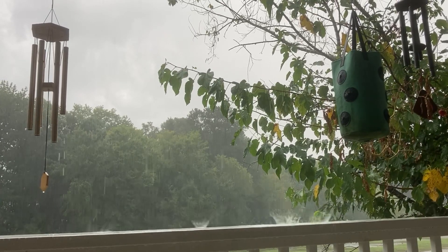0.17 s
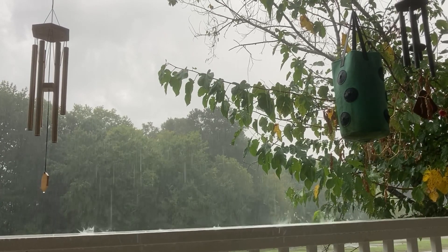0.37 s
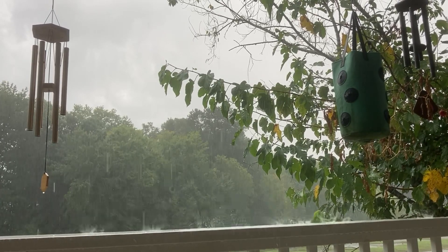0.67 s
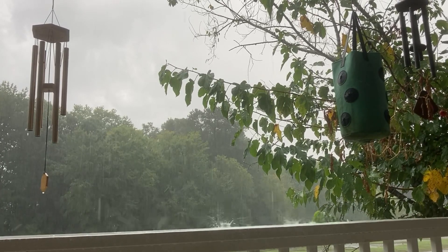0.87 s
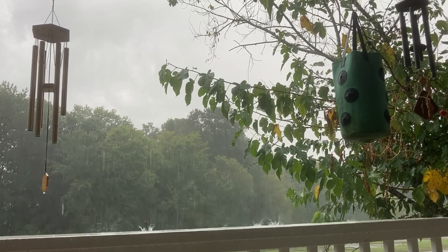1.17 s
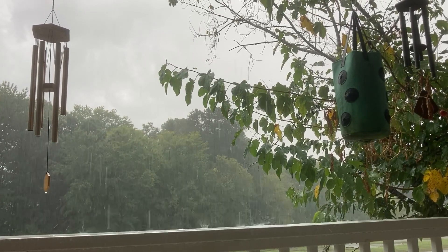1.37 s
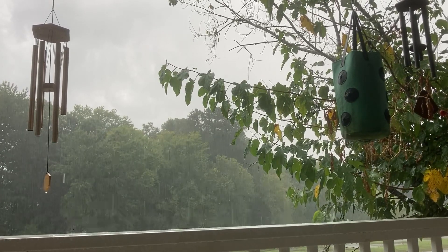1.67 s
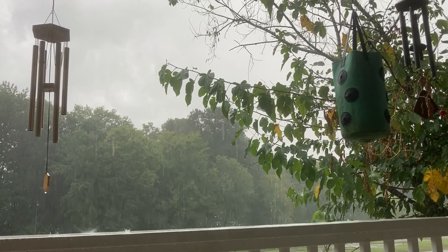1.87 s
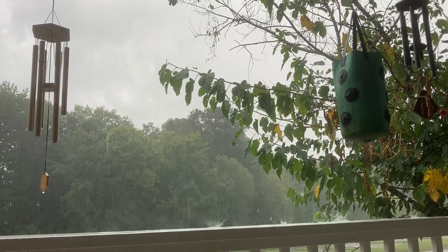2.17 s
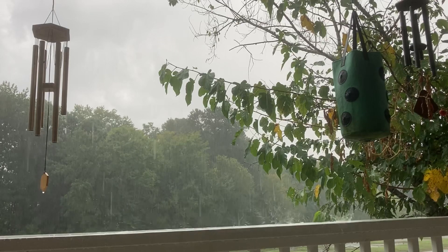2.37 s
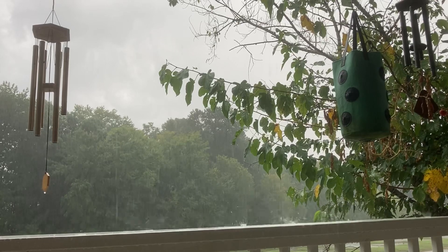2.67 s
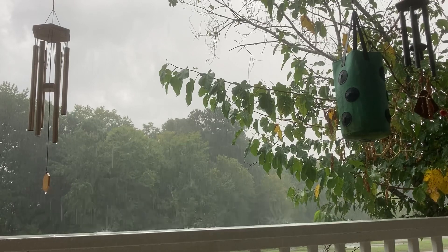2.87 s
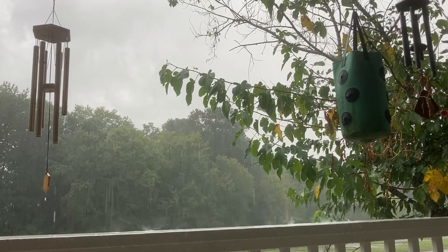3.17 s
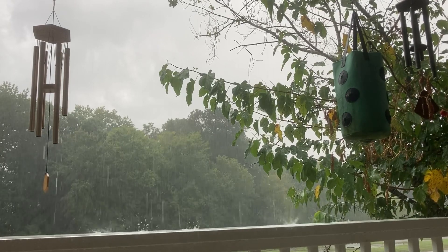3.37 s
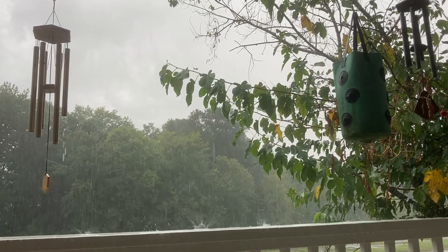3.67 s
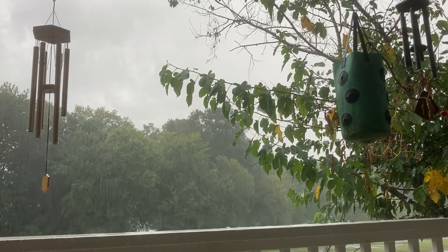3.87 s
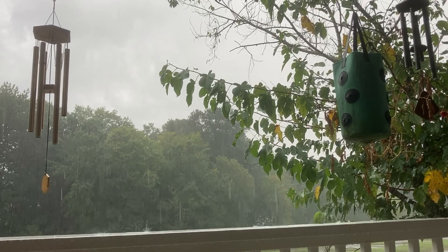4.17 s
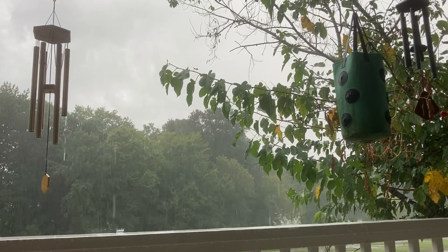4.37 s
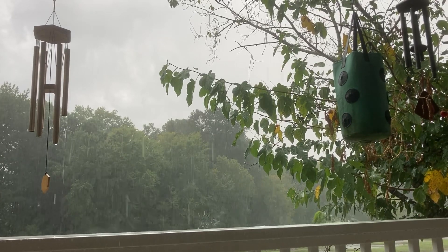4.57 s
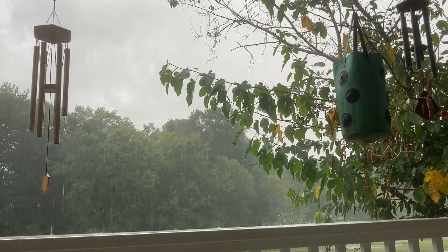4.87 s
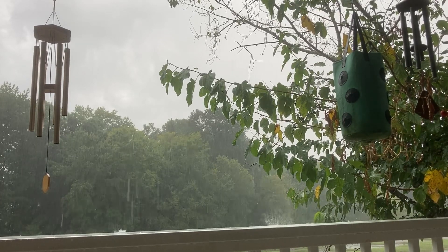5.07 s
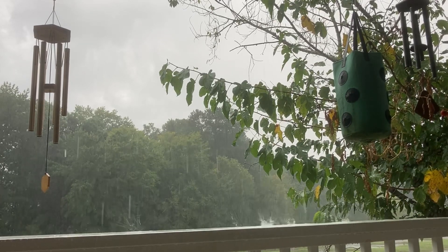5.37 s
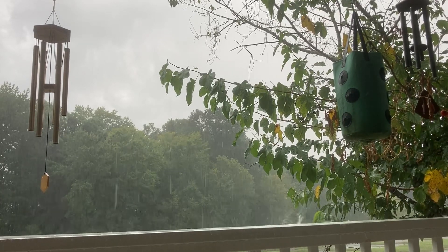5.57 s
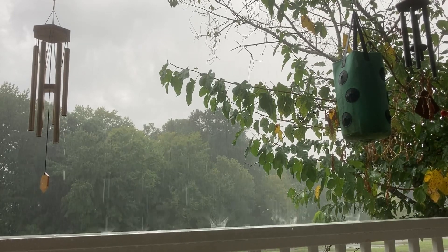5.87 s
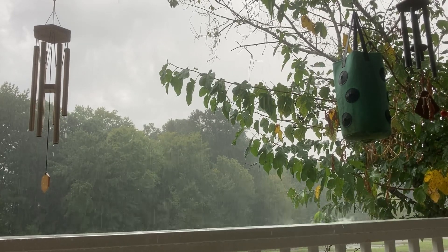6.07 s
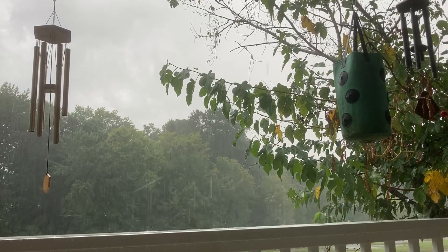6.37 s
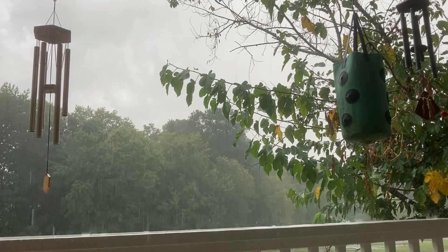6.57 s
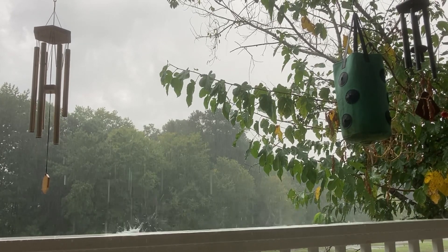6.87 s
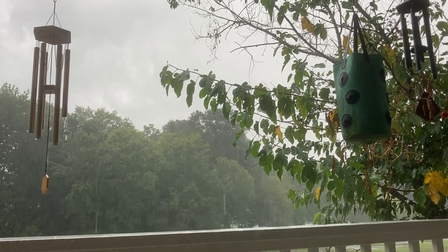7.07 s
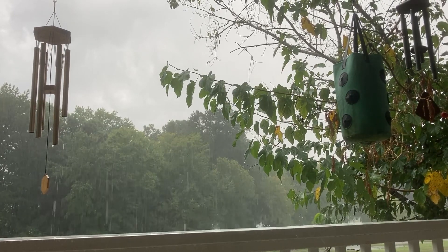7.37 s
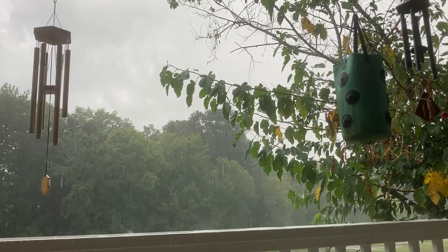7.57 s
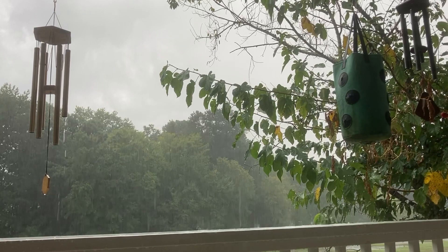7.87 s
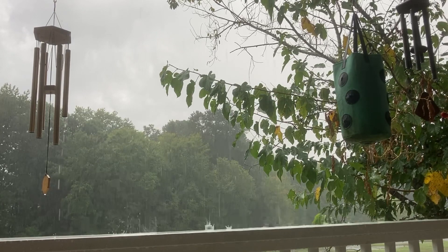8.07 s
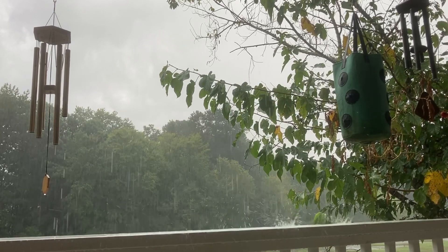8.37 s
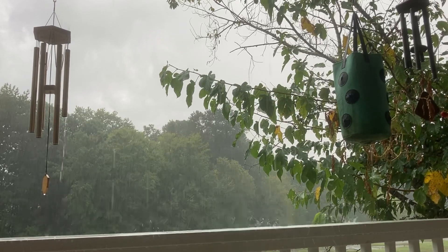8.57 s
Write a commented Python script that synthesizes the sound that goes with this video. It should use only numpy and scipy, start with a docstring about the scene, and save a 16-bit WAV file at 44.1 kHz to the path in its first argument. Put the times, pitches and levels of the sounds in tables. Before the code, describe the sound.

Low far-off thunder booms and dies away behind a steady downpour, with leaf patter, tiny plinks and sharp close drops smacking a wet porch rail.

```python
"""Far thunder is rolling as we begin: three swells, then a fade, behind heavy rain on trees and a lawn.
Heard from a porch: filtered noise makes the boom and the wash, small drops patter on leaves, bubbles plink.
Fat drops from the eaves smack the wet railing close by: short pushes into resonances, with porch echo and spray.
A thin whine runs throughout and a faint moan joins near the end. Two closely spaced ports pick up the rain."""
import sys
import numpy as np
from scipy import signal
from scipy.fft import rfft, irfft
from scipy.io import wavfile
from scipy.ndimage import uniform_filter1d

SR = 44100
rng = np.random.default_rng(int(sys.argv[2]) if len(sys.argv) > 2 else 0)


def output_pcm(signal):
    """Save a mono or channel-first signal as 16-bit PCM at the path in sys.argv[1].

    Samples are clipped to [-1, 1] before scaling.
    """
    pcm = np.clip(np.atleast_2d(signal).T, -1, 1) * 32767
    wavfile.write(sys.argv[1], SR, np.round(pcm).astype(np.int16))


N = 384993

# centre pitches of the thunder's boom, growl and rattle: [f/Hz]
REGISTER_CENTRES = [65, 122, 180]


def amp(db):
    """Decibels to a linear gain."""
    return 10 ** (np.asarray(db) / 20)


def evened(x):
    """Scales x to an rms of one."""
    return x / np.sqrt(np.mean(x ** 2) + 1e-20)


def unit_energy(x):
    """Scales each channel to an energy of one."""
    return x / np.linalg.norm(x, axis=-1, keepdims=True)


def read(points, hz):
    """A table's value at each frequency, on a log axis."""
    f, value = np.transpose(points)
    return np.interp(np.log(hz + 1), np.log(f + 1), value)


def bins(size):
    """The frequencies, in Hz, of a spectrum of this many samples."""
    return np.fft.rfftfreq(size, 1 / SR)


def colour(x, db):
    """Filters x by a gain in dB for each of its frequency bins."""
    return irfft(rfft(x) * amp(db), x.shape[-1])


def ring(x, hz, q):
    """A single resonance; the higher q, the narrower."""
    return signal.lfilter(*signal.iirpeak(min(hz, SR / 3), max(q, 1), fs=SR), x)


def add(mix, s, sound):
    """Lays a sound into the mix at s seconds, cut at the end."""
    part = mix[:, max(round(s * SR), 0):][:, :sound.shape[1]]
    part += sound[:, :part.shape[1]]


def drifting(shape, frames):
    """Noise smoothed over this many frames, at an rms of one."""
    return evened(uniform_filter1d(rng.standard_normal(shape), size=frames, axis=0))


def swell(t, full_s, hold_s, fade_db_per_s, rise_s=0.58):
    """The gain of one roll: it swells, holds, then dies away among the hills."""
    rise = np.clip(1 + (t - full_s) / rise_s, 0, 1)
    return rise * amp(-fade_db_per_s * np.maximum(t - full_s - hold_s, 0))


def surges(t, centre_hz, thump_s=0.028, thump_octaves=0.46, lull_s=0.044):
    """The gain by which thumps lift one register of the thunder, most near their pitch, and lulls sink the boom."""
    # single surges that stand out of a roll: [t/s, lift at its own pitch/dB, f/Hz]
    thumps = [(0.29, 5, 65), (0.65, 7, 65), (0.80, -1, 65), (1.04, 0, 65), (1.62, 5, 65), (1.88, 4.5, 75),
              (1.97, 8, 65), (2.10, 5.5, 65), (2.27, 5, 120), (2.43, 9, 65), (2.55, 2.5, 160),
              (2.73, 2.5, 125), (2.85, 2, 65), (3.01, 4, 65), (3.16, 6, 150), (3.31, 2, 175),
              (3.411, 1.5, 64), (3.63, 10, 88), (3.94, 8, 65), (4.31, 11.5, 122), (4.47, 20, 94),
              (4.57, 1, 122), (4.67, 2.5, 175), (4.85, 5, 120), (4.93, 9.5, 65), (5.07, 6.5, 175),
              (5.219, 7, 65), (5.37, 9, 65), (5.64, 4.5, 65), (6.06, 7.5, 65)]
    # lulls of the boom between surges: [t/s, change/dB]
    lulls = [(0.15, -3), (0.46, -7), (1.15, -7), (1.44, -4.5), (2.33, -3), (2.64, -2.5), (3.33, -8),
             (4.25, -7), (5.89, -6)]
    gain_db = 0
    for s, db, hz in thumps:
        octaves_off = np.log2(hz / centre_hz)
        gain_db = gain_db + db * np.exp(-((t - s) / thump_s) ** 2 - (octaves_off / thump_octaves) ** 2)
    if centre_hz == REGISTER_CENTRES[0]:
        for s, db in lulls:
            gain_db = gain_db + db * np.exp(-((t - s) / lull_s) ** 2)
    return amp(gain_db)


def thunder(growl_hz=98, rattle_hz=153, apart=0.14, low_cut_hz=39.7, steady_s=0.17):
    """Arrivals from all along a far lightning channel merge into a boom; nearer stretches growl and rattle higher."""
    # thunder dulled by distance, coloured by ground and walls: [f/Hz, relative level per Hz/dB]
    boom_colour = [(24, -13), (38, -8.5), (52, -11), (62, -0.5), (76, -5.5), (98, -16), (114, -3.5),
                   (134, -7), (156, -15), (173, -9), (188, -19), (202, -12), (235, -23.5), (290, -26.5),
                   (460, -64)]
    # the thunder lies to the right: [f/Hz, left minus right/dB]
    lean = [(70, -0.8), (120, -6), (250, -2)]
    # rolls: [full strength t/s, hold/s, boom level/dB, growl level/dB, rattle level/dB]
    rolls = [(0.15, 0.68, -34, -44.5, -47), (1.9, 0.74, -33, -39, -45), (4.35, 0.5, -35.5, -41.5, -44.5)]
    # boom, growl and rattle of every roll: [lag/s, extra hold/s, fade/dB per s, lingering rumble level/dB]
    registers = [(0.019, 0.15, 5.5, -49.5), (0.02, 0.01, 6.5, -54), (0.22, 0.55, 10.5, -54.5)]

    t, hz = np.arange(N) / SR, bins(N)
    mid, side = colour(rng.standard_normal((2, N)), read(boom_colour, hz))
    ports = np.array([mid + apart * side, mid - apart * side])
    ports = colour(ports, read(lean, hz) * np.array([[.5], [-.5]]))
    # steep splits into the three registers
    boom = colour(ports, -20 * np.log10(1 + (hz / growl_hz) ** 20))
    below_rattle = colour(ports, -20 * np.log10(1 + (hz / rattle_hz) ** 20))
    bands = [boom, below_rattle - boom, ports - below_rattle]

    window = max(round(steady_s * SR), 1)  # flutter quicker than this is left to chance
    out = np.zeros((2, N))
    for k, band in enumerate(bands):
        lag_s, longer_s, fade, linger_db = registers[k]
        wanted = amp(linger_db) ** 2
        for s, hold_s, *dbs in rolls:
            wanted = wanted + (amp(dbs[k]) * swell(t - lag_s, s, hold_s + longer_s, fade)) ** 2
        power = uniform_filter1d(uniform_filter1d(band.mean(0) ** 2, size=window), size=3000)
        out += band * surges(t, REGISTER_CENTRES[k]) * np.sqrt(wanted / (power + 1e-20))
    # the microphone rolls off the lowest octave
    return colour(out, -10 * np.log10(1 + (low_cut_hz / (hz + 1)) ** 8))


def wash(level_db=-38.2, patchy_db=2.0, swell_db=-0.26, flicker_db=1.5):
    """Countless far drops merge into a hiss in drifting patches; its treble flickers as clusters of drops land."""
    # far rain: [f/Hz, relative level per Hz/dB]
    rain_colour = [(40, -8), (130, 1), (210, 6), (290, 7.4), (400, 4.2), (600, .6), (1000, 1.2),
                   (1500, -.1), (2300, 1.6), (3000, -.3), (4400, -.9), (5500, -3.9), (7000, -5.5),
                   (8400, -5), (10000, -4.2), (12500, -7.3), (14500, -10.6), (16000, -12.5)]
    frames, hz = N // 256 + 6, bins(1024)
    shape = (2, frames, len(hz))
    z = rng.standard_normal(shape) + 1j * rng.standard_normal(shape)
    # patches spread over neighbouring frames and neighbouring pitches
    patches = uniform_filter1d(rng.standard_normal(shape[1:]), size=11, axis=0)
    patches = evened(uniform_filter1d(patches, size=3, axis=1))
    slow = drifting((frames, 1), 60)
    flicker = drifting((frames, 1), 6) * np.minimum(hz / 9000, 1)
    z = z * amp(patchy_db * patches + swell_db * slow + flicker_db * flicker)
    hiss = signal.istft(z.transpose(0, 2, 1), nperseg=1024, noverlap=768)[1][:, :N]
    return amp(level_db) * evened(colour(hiss, read(rain_colour, bins(N))))


def whine(level_db=-62, hz=7250, width_hz=70):
    """A thin steady whine under the rain, perhaps an insect in the trees: noise through a narrow resonance."""
    return amp(level_db) * evened(ring(rng.standard_normal((2, N)), hz, hz / width_hz))


def smack(hz, echo_db, push_s, q, below=0.7, echo_t60=0.16, gap_s=0.0035):
    """One drop: a very short push into a resonance, then scattered reflections from the porch."""
    t = np.arange(SR // 6) / SR
    push, taps = rng.standard_normal((2, 2, len(t)))
    push = push * np.exp(-t / push_s)
    sparse = rng.random(taps.shape) < .2
    taps = taps * sparse * amp(-60 * t / echo_t60) * np.clip(t / gap_s - .5, 0, 1)
    # so small a source radiates little below its pitch
    highpass = signal.butter(6, min(below * hz, SR / 3), "high", fs=SR, output="sos")
    paths = signal.sosfilt(highpass, [push, taps])
    direct, echo = unit_energy(ring(ring(paths, hz, q), hz, q))
    # the direct energy counts as if spread over about a millisecond and a half
    return (direct + amp(echo_db) * echo) * np.sqrt(SR * 0.0014)


def leaves(level_db=-49, drops_per_s=260, spread_db=2.5, low_hz=1800, high_hz=12000,
           echo_db=-2, push_s=0.0011, q=1.84, count=24):
    """Small drops patter on the leaves; each set of leaves has its own pitch and channel balance."""
    out = np.zeros((2, N))
    for hz in np.geomspace(low_hz, high_hz, count):
        size = amp(spread_db * np.minimum(rng.exponential(1, N), 3.5))
        hits = size * (rng.random(N) < drops_per_s / count / SR)
        balance = amp(rng.uniform(-0.24, 6.2) * np.array([[1], [-1]]))
        out += signal.oaconvolve(hits[None], balance * smack(hz, echo_db, push_s, q), axes=1)[:, :N]
    return amp(level_db) * evened(out)


def puddles(level_db=-48.5, drips_per_s=330, spread_db=1.0, low_hz=1100, high_hz=5000,
            cycles=18, rise=0.0372, count=48):
    """Drips trap bubbles that ring for some cycles and rise slightly in pitch."""
    out, t = np.zeros((2, N)), np.arange(SR // 12) / SR
    for hz in np.geomspace(low_hz, high_hz, count):
        age = hz * t / cycles
        plink = np.sin(2 * np.pi * hz * t * (1 + rise * age / 2)) * np.exp(-age)
        size = amp(spread_db * np.minimum(rng.exponential(1, (2, N)), 3)) * np.sqrt(hz)
        # each channel takes half of the drips
        hits = size * (rng.random((2, N)) < drips_per_s / count / SR / 2)
        out += signal.oaconvolve(hits, plink[None], axes=1)[:, :N]
    return amp(level_db) * evened(out)


def railing_echo(echo_db, level_db, near_db=-19.5, wetter=0.38):
    """Faint drops land further along the railing: more echo, in dB, for each dB below a drop by the microphone."""
    return echo_db + wetter * (near_db - level_db)


def spray(fall_s=0.2, rise_s=0.0014, droplets_per_s=3500, low_hz=7000):
    """The burst drop comes down again as a fading shower of tiny droplets."""
    t = np.arange(SR // 3) / SR
    droplets = rng.standard_normal((2, len(t))) * (rng.random(len(t)) < droplets_per_s / SR)
    fizz = signal.lfilter(*signal.butter(2, min(low_hz, SR / 3), "high", fs=SR), droplets)
    return evened(fizz) * np.exp(-t / fall_s) * (1 - np.exp(-t / rise_s))


def splashes(spray_db=1, echo_db=-3.5, push_s=0.0011, q=1.4):
    """Drops burst the film of water on the railing with a broad, crisp tick and throw up spray."""
    # drops on the wet film: [t/s, level/dB, f/Hz, spray level before the spray_db lift/dB]
    bursts = [ (0.075, -37, 7040, -44), (0.209, -28, 12000, -50), (0.665, -30, 13500, -45),
              (0.690, -35, 6300, -48), (0.830, -36, 7400, -48), (0.903, -35, 7000, -52),
              (1.132, -30.5, 7600, -46), (1.141, -35, 9100, -41), (1.510, -33, 8800, -42),
              (1.693, -24, 8060, -52), (2.021, -39, 6800, -52), (2.625, -33, 13000, -50),
              (2.656, -33, 11500, -45), (3.078, -34, 10440, -41.5), (3.235, -33, 9500, -42),
              (3.322, -34, 10000, -42), (4.614, -31, 8400, -47), (4.819, -31, 5700, -47),
              (4.835, -29, 13000, -54), (5.045, -39, 11000, -44), (5.326, -32, 10500, -44),
              (5.745, -35, 7500, -41), (6.002, -27.5, 6300, -43), (6.058, -33, 10500, -54),
              (6.445, -35, 9100, -41), (6.700, -41, 12000, -49), (7.216, -30, 12000, -45),
              (7.470, -26, 11500, -43), (8.120, -39, 6300, -54), (8.282, -20, 6640, -39),
              (8.296, -27, 7200, -45)]
    out = np.zeros((2, N))
    for s, db, hz, mist_db in bursts:
        add(out, s, amp(db) * smack(hz, railing_echo(echo_db, db), push_s, q))
        add(out, s, amp(mist_db + spray_db) * spray())
    return out


def patters(level_db=-41.5, spread_db=4.0, low_hz=1300, high_hz=5000, echo_db=4.5, push_s=0.0011, q=4.6, count=60):
    """Further off, drops from the eaves pat on the boards and the ground, just above the wash."""
    out = np.zeros((2, N))
    for when, pitch, size in rng.random((count, 3)):
        hz = low_hz * (high_hz / low_hz) ** pitch
        gain = amp(level_db + spread_db * (2 * size - 1.5))
        add(out, when * N / SR, gain * smack(hz, echo_db, push_s, q))
    return out


def knocks(echo_db=-2.0, push_s=0.00065, q=3.4, below=0.75, echo_t60=0.14):
    """Fat drops strike the wood of the railing with a short knock of clear pitch."""
    # drops on the wood: [t/s, level/dB, f/Hz]
    strikes = [ (0.209, -35, 4200), (0.829, -37, 4700), (0.904, -34, 4500), (1.489, -34.5, 3330),
               (1.693, -21.5, 4180), (1.960, -38, 2660), (2.021, -35, 5700), (2.656, -36, 4000),
               (3.078, -31.5, 3370), (3.254, -36.5, 5100), (3.859, -38, 4300), (4.614, -33.5, 4900),
               (4.819, -27, 2540), (4.826, -29, 2720), (5.069, -33.5, 4600), (5.751, -34, 4530),
               (6.003, -31, 4400), (6.445, -34, 4370), (7.023, -36, 3100), (7.108, -30, 3960),
               (7.721, -36, 2460), (7.868, -32, 1920), (8.281, -33, 4100), (8.282, -34, 3000),
               (8.482, -34, 4900)]
    out = np.zeros((2, N))
    for s, db, hz in strikes:
        add(out, s, amp(db) * smack(hz, railing_echo(echo_db, db), push_s, q, below, echo_t60))
    return out


def moan(start_s=8.4, swell_s=0.16, level_db=-50, hz=207, width_hz=22):
    """A faint hollow moan, noise through two resonances, swells under the rain as the thunder dies."""
    t = np.arange(N) / SR
    tone = ring(ring(rng.standard_normal(N), hz, hz / width_hz), hz, hz / width_hz)
    return amp(level_db) * evened(tone) * np.clip((t - start_s) / swell_s, 0, 1)


def port_pair(x):
    """Two ports share part of the sound, with a phase that turns with frequency from the gap between them."""
    # how alike the ports hear the rain, held to 0.98 at most: [f/Hz, left-right likeness/1]
    likeness = [(60, 0.79), (250, 0.85), (600, 0.51), (1000, 0.6), (1400, 0.16), (1900, 0.39),
                (3000, 0.023), (4600, 0.15), (6000, 0.24), (7000, 0.59), (9000, 1), (15000, 1)]
    # a steady turn in the treble: [f/Hz, phase by which the left port leads/rad]
    lead = [(50, 0), (900, .4), (1300, 0), (1600, -2.4), (2200, -2.1), (4500, 0), (5800, 3), (6800, 6.3),
            (7400, 5.9), (8300, 3.8), (9700, 2.5), (11300, 0), (13000, -2.5), (14300, -3.8), (15600, -6.3)]
    hz = bins(N)
    left, other = rfft(x)
    same = np.clip(read(likeness, hz), 0, .98)
    right = (same * left + np.sqrt(1 - same ** 2) * other) * np.exp(-1j * read(lead, hz))
    return irfft(np.array([left, right]), N)


def scene():
    """Thunder from the right, the rain through the port pair, and the moan in the middle."""
    far_thunder = thunder()
    rain = wash() + whine() + leaves() + puddles() + patters() + knocks() + splashes()
    return far_thunder + port_pair(rain) + moan()


def record(dry, edge_hz=15850):
    """The recorder's band limit: a steep low-pass."""
    lowpass = signal.firwin(1023, edge_hz, window=("kaiser", 9), fs=SR)
    return signal.oaconvolve(dry, lowpass[None], "same", axes=1)


dry = scene()
out = record(dry)
output_pcm(out)
```